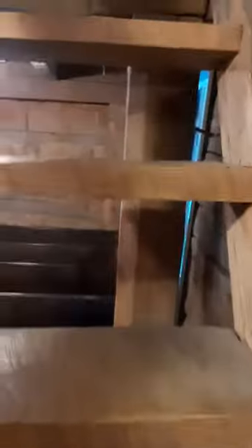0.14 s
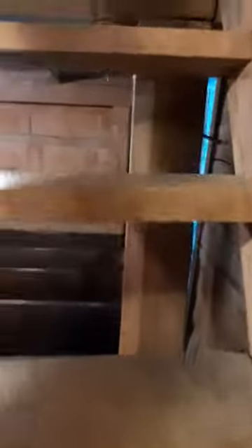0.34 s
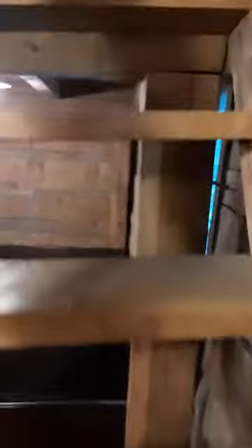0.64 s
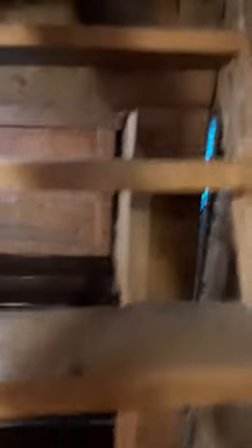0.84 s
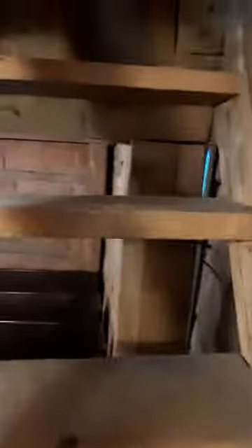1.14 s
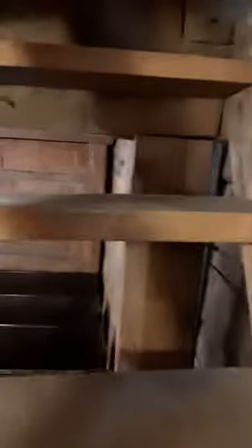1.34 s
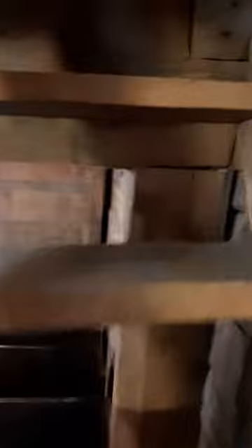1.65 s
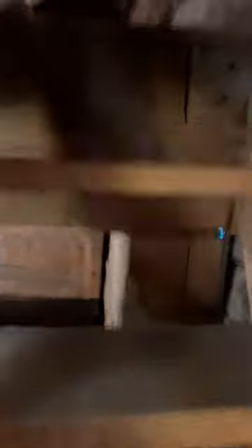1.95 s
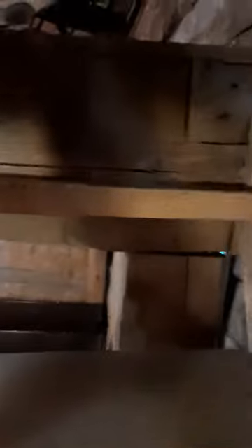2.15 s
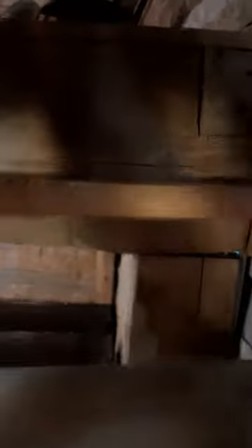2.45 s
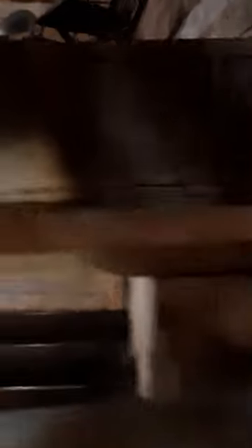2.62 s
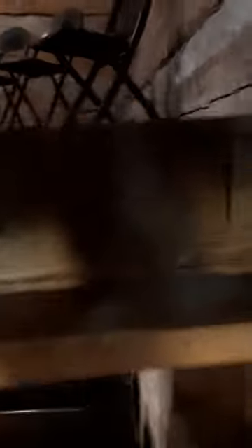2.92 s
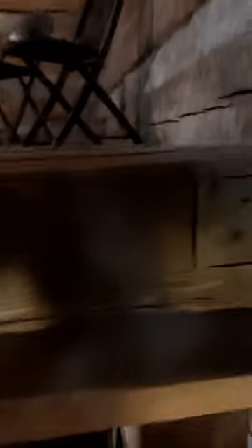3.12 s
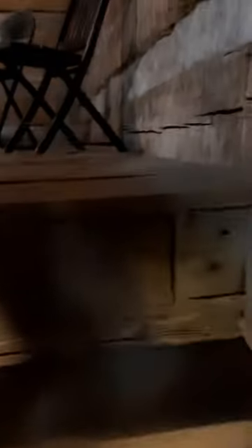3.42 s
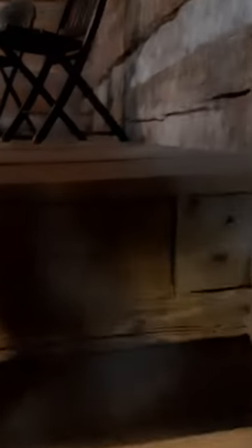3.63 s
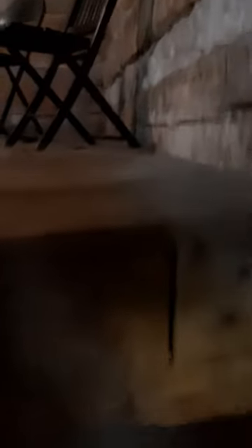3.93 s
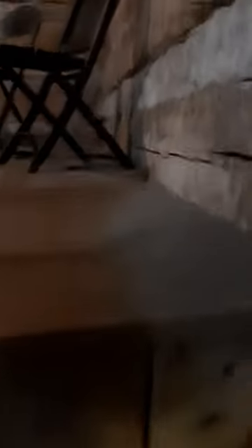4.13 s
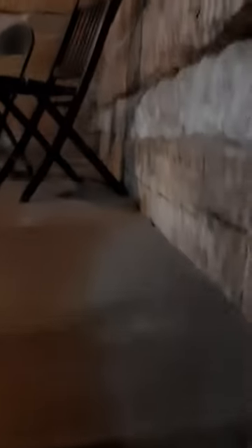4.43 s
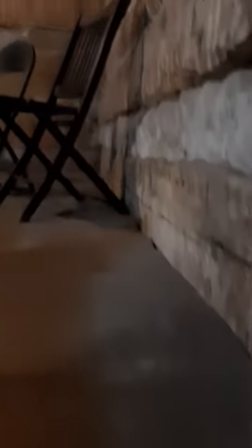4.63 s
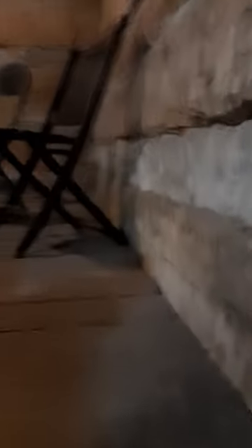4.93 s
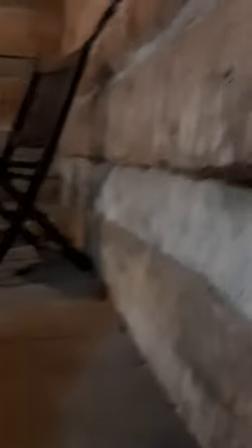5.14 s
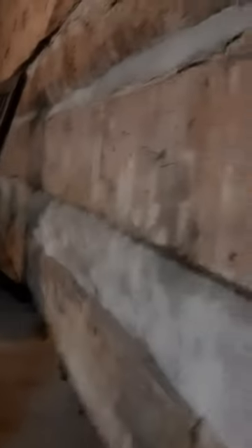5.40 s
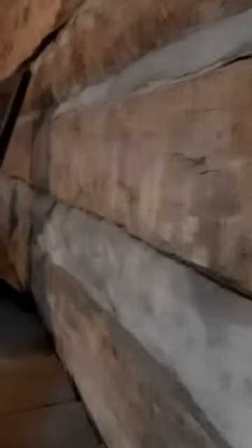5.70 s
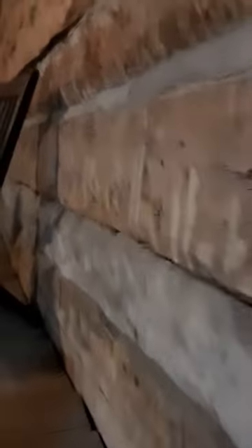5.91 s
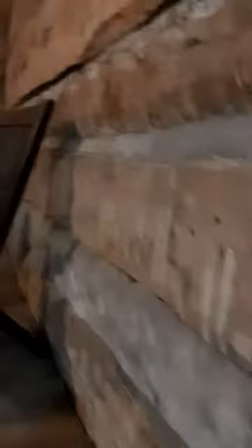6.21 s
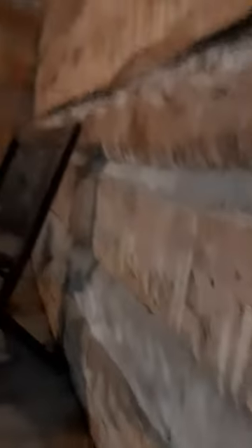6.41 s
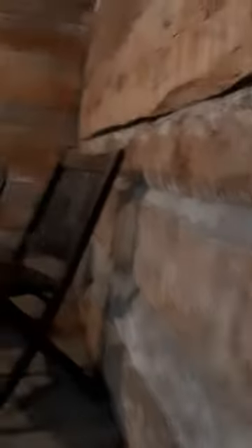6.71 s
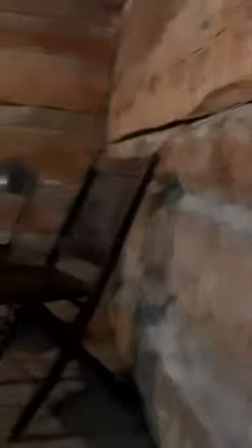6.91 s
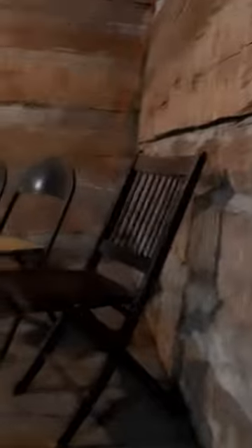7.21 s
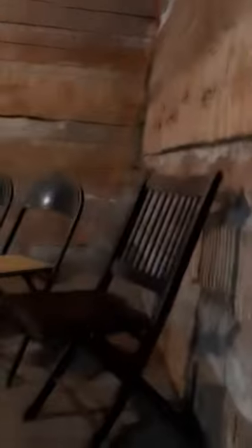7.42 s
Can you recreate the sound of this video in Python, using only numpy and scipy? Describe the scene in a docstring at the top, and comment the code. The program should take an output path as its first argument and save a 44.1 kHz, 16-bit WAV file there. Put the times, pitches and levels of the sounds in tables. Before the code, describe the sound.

Someone climbs open wooden stairs inside an old log building. Heel and toe thuds boom low through treads and beams, each trailed by a soft rumble. Dry ticks and cracks snap between steps, with short scuffs and faint cloth rustle. Later steps land heaviest, with a hollow board knocking between them. A close handheld stereo microphone favours the right; the left is duller, the room short and woody.

```python
"""Someone climbs open wooden stairs to the boarded upper floor of a log building, a phone in hand.
From the start rumble swells after each step, and cloth and shoes hiss near the right microphone.
Heels and toes boom as ringing modes and sine tones; at 0.7 s a board creaks in a short upward glide.
Noise bursts tick and crack around 2, 2.8 and 3.3 s; the heaviest steps land at 5.7 and 6.6 s.
Between, at 6.1-6.4 s, a hollow board rings. All along, the left microphone hears it later and duller."""
import sys
import numpy as np
from scipy import signal
from scipy.fft import rfft, irfft, next_fast_len
from scipy.io import wavfile
from scipy.ndimage import uniform_filter1d

SR = 44100
rng = np.random.default_rng(int(sys.argv[2]) if len(sys.argv) > 2 else 0)


def master(y):
    """Save y as 16-bit WAV."""
    cut = np.clip(np.atleast_2d(y).T, -1, 1)
    pcm = np.round(cut * 32767)  # scale
    wavfile.write(sys.argv[1], SR, pcm.astype(np.int16))


N = 333313


def from_db(db):
    """Gain of a level."""
    return 10 ** (np.asarray(db) / 20)


def rms_one(x):
    """Scales to rms 1."""
    return x / np.sqrt(np.mean(x ** 2) + 1e-20)


def colour(x, spectrum, lag=0., closed=True):
    """Shapes the spectrum and delays by lag samples; a closed shape is silent outside its range."""
    size = next_fast_len(N, True)
    hz = np.arange(size // 2 + 1) * SR / size + 1e-3   # offset avoids log(0)
    at, db = np.transpose(spectrum)
    gain = from_db(np.interp(np.log(hz), np.log(at), db))
    if closed:
        gain = gain * ((hz > at[0]) & (hz < at[-1]))
    delay = np.exp(-2j * np.pi * hz * lag / SR)
    return irfft(rfft(x, size) * gain * delay, size)[..., :N]


def drift(rate):
    """Slow random wander with spread 1: noise through two equal lowpass poles at rate Hz."""
    r = np.exp(-80 * np.pi * rate / SR)   # one value every 40 samples
    slow = signal.lfilter([1], [1, -2 * r, r * r], rng.standard_normal(N // 40 + 2002))[2000:]
    return np.interp(np.arange(N) / 40, np.arange(len(slow)), rms_one(slow))


def ring(force, hz, t60):
    """Resonator: a unit click sets a dying sine of height 1 ringing."""
    r = from_db(-60 / (max(t60, .01) * SR))
    w = 2 * np.pi * hz / SR
    return signal.lfilter([0, np.sin(w)], [1, -2 * r * np.cos(w), r * r], force + 1e-18)


def near(hz, centre_hz, octaves):
    """How strongly a mode answers a contact whose own pitch is the centre."""
    return np.exp(-.5 * (np.log2(hz / centre_hz) / octaves) ** 2)


def add(track, s, piece):
    """Mixes a piece in at a moment."""
    i = int(s * SR)
    track[..., i:i + piece.shape[-1]] += piece[..., :N - i]


def level(rows, column):
    """Gain curve from one column of a table."""
    rows = np.transpose(rows)
    return from_db(np.interp(np.arange(N) / SR, rows[0], rows[column]))


def grains(per_s, spread_db):
    """Dense random micro-contacts of uneven size over an even hiss; rms 1."""
    sizes = from_db(spread_db * np.minimum(rng.exponential(1, N), 5))
    sizes = sizes * (rng.random(N) < per_s / SR)
    return rms_one(rng.standard_normal(N) * (4.5 + rms_one(uniform_filter1d(sizes, size=12))))


ROOM_T60_S, WALL_CUT_HZ, ROOM_LOW_HZ = 0.34, 7200, 320


def room(x):
    """Ten feedback delays a side, duller on every round; the bass belongs to the timber itself."""
    size = next_fast_len(N + SR // 2, True)
    w = 2 * np.pi * np.arange(size // 2 + 1) / size
    dull = 1 / (1 + 1j * w * SR / (2 * np.pi * WALL_CUT_HZ))
    high = signal.butter(2, ROOM_LOW_HZ, "high", fs=SR, output="sos")
    sent = rfft(signal.sosfilt(high, x), size)
    out = []
    for lags in rng.uniform(.011, .035, (2, 10)) * SR:
        loops = [from_db(-60 * d / SR / ROOM_T60_S) * dull * np.exp(-1j * w * d) for d in lags]
        echoes = sum((-1) ** k * g / (1 - g) for k, g in enumerate(loops))
        out.append(irfft(sent * echoes, size)[:N])
    return np.array(out)


# swell time, fall in dB/s, level under each landing, floor at rest, remains of an earlier step
SWELL_S, DYING_DB_PER_S, LOAD_DB, REST_DB, EARLIER_DB = 0.11, 50, -20.5, -73.5, -54.5
# colour of the loaded timber's rumble: [f/Hz, spectral level/dB]
RUMBLE_COLOUR = [(18, -38), (30, -1.5), (57, 2), (81, 5.5), (233, -8.5), (400, -16.5), (520, -17.5),
                 (880, -120)]


def rumble():
    """The loaded timber never quite rests: it swells after each landing, then dies away."""
    t = np.arange(0, N + 100, 100) / SR
    power = from_db(2 * REST_DB) + from_db(2 * (EARLIER_DB - DYING_DB_PER_S * t))
    for s, db, *_ in LANDINGS:
        swell = np.clip((t - s) / SWELL_S, 0, 1) ** 4
        dying_db = db + LOAD_DB - DYING_DB_PER_S * np.abs(t - s - SWELL_S)
        power += swell * from_db(2 * dying_db)
    gain = np.interp(np.arange(N) / SR, t, np.sqrt(power))
    noise = rms_one(colour(rng.standard_normal(N), RUMBLE_COLOUR))
    return gain * from_db(2.4 * drift(22)) * noise


RUSTLE_DB, HISS_DB, SCUFF_DB = 5.5, 2.5, 5.5   # over the movement curves
# the walker's movement, before those gains: [t/s, cloth level/dB, shoe scuff level/dB]
MOVEMENT = [(0.0, -78.5, -73.5), (0.23, -73.5, -89.5), (0.42, -71, -75), (0.71, -73.5, -82.5),
            (0.95, -68.5, -77), (1.39, -79.5, -85.5), (1.74, -73, -81), (1.96, -68.5, -77),
            (2.21, -78, -85), (2.86, -68, -73.5), (3.43, -73, -80), (4.08, -70.5, -76), (4.38, -74, -83),
            (4.69, -70, -80.5), (4.97, -79, -79.5), (5.28, -69, -75.5), (5.64, -74.5, -81.5),
            (6.34, -73, -68), (6.78, -68.5, -73), (7.07, -62.5, -72), (7.3, -72, -75.5), (7.56, -71, -72)]
# colour of shoe scuff: [f/Hz, spectral level/dB]
SCUFF_COLOUR = [(180, -16), (300, -8.5), (629, -6), (1040, -9.5), (1230, -10), (1520, -3), (1740, -10),
                (2070, -3), (2390, -6), (3500, -6), (4550, -63), (7700, -120)]
# colour of the main cloth band: [f/Hz, spectral level/dB]
RUSTLE_COLOUR = [(1760, -21), (3000, -11), (4910, 6), (5950, 2), (7660, -2), (8560, -14), (9000, -9.5),
                 (11700, -50), (19800, -120)]
# colour of the upper cloth band: [f/Hz, spectral level/dB]
HISS_COLOUR = [(5000, -8), (8500, -34.5), (9300, -6.5), (11500, 4), (13500, 4), (15100, 6.5), (16000, -42)]


def moving():
    """Shoe scuff and two bands of cloth noise, flickering together; the cloth bands share their grains."""
    cloth = grains(400, spread_db=3.5)
    flicker_db = 1.8 * drift(12)
    scuff = from_db(SCUFF_DB + flicker_db + 3.1 * drift(19))
    scuff = scuff * rms_one(colour(grains(150, spread_db=3.0), SCUFF_COLOUR))
    rustle = from_db(RUSTLE_DB + flicker_db) * rms_one(colour(cloth, RUSTLE_COLOUR))
    hiss = from_db(HISS_DB + 2.3 * flicker_db + 1.0 * drift(9.7)) * rms_one(colour(cloth, HISS_COLOUR))
    return level(MOVEMENT, column=2) * scuff + level(MOVEMENT, column=1) * (rustle + hiss)


# short rising creak of a board: [t/s, length/s, start f/Hz, end f/Hz, level/dB, octave level/dB]
BOARD_CREAK = (.664, .027, 640, 830, -57, -7)


def creak():
    """A board slips briefly: a tone and its octave glide up, uneven in level."""
    s, length, from_hz, to_hz, db, octave_db = BOARD_CREAK
    t = np.arange(int(length * SR)) / SR
    phase = 2 * np.pi * np.cumsum(from_hz + (to_hz - from_hz) * t / length) / SR
    tone = np.sin(phase) + from_db(octave_db) * np.sin(2 * phase)
    uneven = from_db(db + 2.6 * rng.standard_normal(20).repeat(70)[:len(t)])
    out = np.zeros(N)
    add(out, s, uneven * np.sqrt(np.sin(np.pi * t / length)) * tone)
    return out


HOLLOW_FROM_S, HOLLOW_TO_S = 6.09, 6.4   # the hollow board is knocked in this span
HOLLOW_DB, HOLLOW_PAN_DB = -3, -6.5   # ring against its tick; left against right
# modes of the hollow board: [f/Hz, level/dB, t60/s]
HOLLOW_MODES = [(420, -7.5, 0.079), (833, 1, 0.077), (1320, 4, 0.034), (1534, -0.5, 0.048),
                (2076, -2, 0.055), (2420, -11, 0.027), (2685, -5.5, 0.04)]


def hollow():
    """Ticks on the hollow board set its modes ringing cleanly; left and right."""
    clicks = np.zeros((len(HOLLOW_MODES), N))
    for s, db, *_ in TICK_EVENTS:
        if HOLLOW_FROM_S < s < HOLLOW_TO_S:
            uneven_db = rng.normal(0, 1.2, len(HOLLOW_MODES))
            clicks[:, int(s * SR)] = from_db(db + HOLLOW_DB + uneven_db)
    rings = sum((-1) ** k * from_db(db) * ring(clicks[k], hz, t60)
                for k, (hz, db, t60) in enumerate(HOLLOW_MODES))
    return rings * from_db([[HOLLOW_PAN_DB], [0]])


FAINT_COUNT, FAINT_DB, FAINT_SPREAD_DB = 14, -59, 3   # level varies evenly by plus or minus the spread
FAINT_BOARD_DB, FAINT_EDGE_DB = -25, -18


def faint_ticks():
    """Small ticks of boards and shoes at random moments and pitches, in rows like the loud ones."""
    rows = []
    for when, loud, pitch in rng.random((FAINT_COUNT, 3)):
        db = FAINT_DB + 2 * FAINT_SPREAD_DB * (loud - .5)
        rows.append((when * N / SR, db, 400 * 5 ** pitch, FAINT_BOARD_DB, FAINT_EDGE_DB))
    return rows


STROKE_RISE_S, STROKE_BOARD_DB, STROKE_PAN_DB = 0.0036, -20, -10.5   # pan: left against right
# longer scrapes over wood, and a few very short bright ticks; board level is before STROKE_BOARD_DB:
# [t/s, length/s, force level/dB, board f/Hz, board level/dB, bright edge level/dB]
STROKE_EVENTS = [(0.486, 0.19, -64.5, 656, -9.5, -17), (0.792, 0.034, -65.5, 640, -13, 0),
                 (.864, 0.07, -76, 377, 1.5, -10), (1.254, 0.09, -59.5, 1090, -2.5, 6),
                 (1.51, 0.26, -64.5, 1070, -6.5, 1), (2.785, 0.17, -53.5, 600, -13.5, 8.5),
                 (3.046, 0.017, -56, 2060, -22, 12), (3.947, 0.018, -59, 1500, -16, 24),
                 (4.798, 0.044, -69, 1570, -7, -5), (4.14, .009, -71, 474, -25, 21),
                 (4.916, 0.097, -64.5, 490, 2.5, 5), (6.418, 0.086, -59, 1490, -4.5, 0),
                 (7.109, 0.11, -60, 2470, -4.5, -7), (7.277, 0.058, -61.5, 1344, -2.5, -1)]


def stroke_contacts():
    """Scrapes and very short ticks: lumpy noise for the length of a stroke, in two draws as for ticks."""
    t = np.arange(12000) / SR
    for s, length, db, board_hz, board_db, edge_db in STROKE_EVENTS:
        stroke = np.clip(t / STROKE_RISE_S, 0, 1) * np.clip((length - t) / (0.34 * length), 0, 1)
        lumps = from_db(4.44 * rng.standard_normal(400).repeat(30))
        grit = rng.standard_normal((2, 12000)) * lumps
        yield s, grit * stroke * from_db(db), board_hz, board_db + STROKE_BOARD_DB, edge_db, STROKE_PAN_DB


# decay at board level 0 dB; its growth in dB per board dB; left against right; other boards meanwhile
TICK_T60_S, WOODY_LONGER, CONTACT_PAN_DB, HOLLOW_MUTE_DB = 0.081, 0.19, -15, -7
# ticks and cracks of boards and shoes, before the offsets below:
# [t/s, level/dB, board f/Hz, board level/dB, bright edge level/dB]
TICK_EVENTS = [(0.119, -51, 456, -17.5, -20), (0.2095, -52.5, 346, -1, -29), (0.2347, -47.5, 2210, -9, -17),
               (0.48, -52.5, 635, -15.5, -33), (0.921, -54, 1530, -21, 2), (1.2478, -56.5, 356, 3.5, -21),
               (1.3985, -51.5, 371, -28, -0.5), (1.5099, -57.5, 623, -1.5, -28),
               (1.702, -52.5, 1550, -8.5, -17), (1.823, -48, 450, -15, -11), (1.9064, -50, 439, -30, -28),
               (1.9656, -38, 2050, -18.5, -26), (1.9885, -32.5, 480, -12.5, -16),
               (2.0036, -31.5, 730, -21.5, -15), (2.139, -51, 476, -23, -6),
               (2.3359, -53.5, 435, -13.5, -13), (2.38, -47, 370, -16, -17), (2.7613, -44, 2500, -30, -18),
               (2.8004, -35, 2450, -33, -8), (2.81, -45, 2490, -12, 1), (2.9222, -40.5, 487, -12, -14),
               (3.0105, -50.5, 1560, -14.5, -8), (3.269, -32.5, 2220, -20, -21.5),
               (3.2869, -38.5, 2000, -16, -15), (3.3214, -49.5, 506, -10.5, -15),
               (3.5765, -56.5, 557, 4, -12), (3.6023, -36.5, 375, -2.5, -14.5),
               (3.6464, -46, 584, -7.5, -19), (3.9818, -41, 1500, -15, -13),
               (4.0622, -40, 1300, -22.5, -11), (4.1834, -47.5, 1530, -34, -24),
               (4.206, -34.5, 2090, -21, -14), (4.645, -43, 443, -12.5, -16),
               (4.912, -41, 1950, -10.5, -22), (5.1363, -40, 2020, -31, -28), (5.3045, -49, 2000, -25, -13),
               (5.4346, -45.5, 2070, -35, -5.5), (5.662, -44.5, 418, -1.5, -33),
               (5.677, -34.5, 372, -5.5, -14), (5.7361, -36.5, 378, -6, -13),
               (5.8331, -48.5, 394, -16, -5.5), (5.9226, -46, 503, -14, -23),
               (5.9338, -30.5, 720, -29, -17.5), (5.9932, -45.5, 710, -19, -9),
               (6.0484, -47, 1530, -13.5, -16), (6.105, -40.5, 820, -7, -19),
               (6.1299, -37, 2000, -9, -16.5), (6.1536, -36.5, 443, -7.5, -18),
               (6.2535, -47, 474, -14, -16), (6.3495, -35.5, 1950, -9.5, -19),
               (6.4616, -50.5, 2020, -5, -18), (6.5778, -34.5, 520, -8, -25),
               (6.594, -31.5, 356, -20.5, -19), (6.6597, -46, 520, -6, -29), (7.2821, -42, 1500, -20, -10),
               (7.3245, -52, 373, -1.5, -18)]
# force of a tick's first touch: [amplitude, one value per sample]
FIRST_TOUCH = 6 * np.array([.5, .6, -.4, -.8, -.1])


def tick_contacts(sharp=0.75, drier=0.25, sputter_db=-6, to_board_db=-11, to_edge_db=18):
    """A snap, sharper when dry and dull, then a dying lumpy sputter; two draws: shared and scattered."""
    t = np.arange(4000) / SR
    for s, db, board_hz, board_db, edge_db in list(TICK_EVENTS) + faint_ticks():
        t60 = np.clip(TICK_T60_S * from_db(WOODY_LONGER * board_db), .004, .1)
        burst = rng.standard_normal((2, 4000)) * from_db(2.5 * rng.standard_normal(100).repeat(40))
        burst *= from_db(-60 * t / t60)
        # energy follows the decay
        burst /= np.sqrt(np.sum(burst ** 2, axis=1, keepdims=True) / (t60 * SR / 14))
        burst *= 1 + sharp * np.exp(-t / 0.00071)   # most force comes at first touch
        burst[:, :5] += FIRST_TOUCH * from_db(-drier * (edge_db + board_db + 41))
        board_db += HOLLOW_MUTE_DB * (HOLLOW_FROM_S < s < HOLLOW_TO_S)
        force = burst * from_db(db + sputter_db)
        yield s, force, board_hz, board_db + to_board_db, edge_db + to_edge_db, CONTACT_PAN_DB


# colour of the crack band: [f/Hz, gain/dB]
CRACK_COLOUR = [(900, -5.5), (2000, 1), (3500, 4), (5500, 5.5), (7500, -1), (8700, -10)]
# colour of the bright edge: [f/Hz, gain/dB]
EDGE_COLOUR = [(8800, -10.5), (11000, -9), (13000, -3), (14200, -5), (16000, -1)]
# modes of the thin boards, shared with the landings; ticks halve the t60: [f/Hz, level/dB, t60/s]
BOARD_MODES = [(348.7, 3, 0.038), (386, 9, 0.027), (439.4, -0.5, 0.081), (494, 3.5, 0.041),
               (583.5, -2, 0.14), (654, 4.5, 0.041), (770, -3.5, 0.15), (837, 1, 0.078), (1074, 4, 0.062),
               (1230, 9, 0.017), (1540, 4.5, 0.076), (1678, 1, 0.053), (2070, 1.5, 0.046),
               (2388, 4.5, 0.018), (2810, -13, 0.24), (3050, -39, 0.11)]


def ticks(scattered=1.0):
    """Each contact has a crack band, a bright edge and the ring of boards near its pitch; left and right."""
    modes = np.array(BOARD_MODES)
    crack, edge, board = np.zeros((2, N)), np.zeros((2, N)), np.zeros((len(modes), 2, N))
    events = list(tick_contacts()) + list(stroke_contacts())
    for s, (direct, other), board_hz, board_db, edge_db, pan_db in events:
        # part of the force scatters on the way to the left; the angle is in radians
        left = direct * np.cos(scattered) + other * np.sin(scattered)
        force = np.array([left, direct]) * from_db([[pan_db], [0]])
        add(crack, s, force)
        add(edge, s, force * from_db(edge_db))
        answer = from_db(board_db + modes[:, 1]) * (near(modes[:, 0], board_hz, 0.17) + 0.42)
        bent = from_db([[0.63 * pan_db], [0]])   # low sound bends round
        add(board, s, answer[:, None, None] * direct * bent)
    rings = sum((-1) ** k * ring(board[k], hz, 0.5 * t60) for k, (hz, db, t60) in enumerate(modes))
    return colour(crack, CRACK_COLOUR) + colour(edge, EDGE_COLOUR) + rings


TREAD_DB, FALL_S = -8.5, 0.041   # tread against landing level; how fast the weight settles
# modes of beams and treads: [f/Hz, level/dB, t60/s]
TIMBER_MODES = [(52, -8, 0.36), (65.55, 6.5, 0.77), (70.7, -2.5, 0.97), (87, -11, .4), (106, -21, 0.16),
                (112.8, 0.5, 0.44), (125.4, -17, 0.91), (143.2, 10.5, 0.31), (160.7, 4.5, 0.14),
                (177.3, 3, 0.53), (188, 8, 0.084), (202.3, 12, 0.25), (228.5, 5.5, 0.41), (257.5, 6, 0.22),
                (305, -3, 0.26)]
# heel and toe landings; beam and knock levels are relative to the landing, before the gains below:
# [t/s, level/dB, beam f/Hz, beam level/dB, tread f/Hz, knock f/Hz, knock level/dB]
LANDINGS = [(0.024, -51, 126, -12, 178, 346, -4), (0.208, -42, 124, -14, 181.7, 344, -20),
            (0.253, -39, 78.1, -18, 197, 387, -15.5), (0.328, -45, 71.5, -21, 192, 353, -22),
            (0.477, -61.5, 64.6, -26, 170, 630, -1), (0.866, -58, 114, -20, 212.4, 383, -5.5),
            (1.246, -39, 124, -22, 154, 354, -8.5), (1.292, -35, 125, -24, 144.4, 377.5, -12.5),
            (1.398, -50, 118, -20, 156, 367, -14), (1.506, -52.5, 86.1, -31, 238, 632, 2.5),
            (1.562, -46, 59.2, -21, 266, 590, -9), (1.698, -53.5, 86.1, -5, 137.5, 482, -27),
            (1.98, -54, 93, -6, 235, 428, 0), (2.334, -44, 123, -14.5, 191.3, 433, -27),
            (2.409, -45, 128, -13, 147.5, 354, -25), (2.52, -51.5, 117, -12, 127.6, 333, -31),
            (2.871, -62, 73.6, -8, 157, 548, 7), (3.575, -42, 125, -33, 205, 590, -12),
            (3.599, -35.5, 64.6, -16, 222.6, 400, -5.5), (3.648, -36.5, 76, -12.5, 222, 593, -5),
            (3.714, -35.5, 76.4, -6.5, 121.5, 586, -12), (3.838, -43.5, 117, -9, 215, 422, -10),
            (3.96, -45.5, 105, -5.5, 189.6, 331, -22), (4.127, -58.5, 61.4, -3, 185, 409, -29),
            (4.643, -43, 78, -8, 214, 446, -8.5), (4.699, -40, 118, -29, 140, 363, -24),
            (4.801, -54, 75, 0, 126, 534, -15), (4.91, -45, 107, -12, 154.5, 473, -4),
            (5.095, -58, 73, 1.5, 134.5, 350, -29), (5.289, -76.5, 75, 15, 138, 546, -21),
            (5.662, -39.5, 126, -13, 202, 428, -10), (5.673, -28.5, 91.5, -16, 181.6, 380, -14.5),
            (5.736, -37.5, 119, -4, 124, 385, -6), (5.788, -41.5, 116, -8, 212, 342, -19),
            (5.928, -45.5, 62.4, -2, 131.5, 683, -6), (6.039, -52, 56, -4.5, 144, 377, -21),
            (6.154, -46, 67, -9, 173, 440, -5), (6.577, -25.5, 105.7, -5, 176, 492, -18),
            (6.658, -37.5, 123, -10, 187.5, 405, -12), (6.717, -37.5, 101.7, -2.5, 120, 553, -14.5),
            (6.808, -46, 94.2, 1, 207, 331, -25), (7.152, -46, 105, -2.5, 126, 505, -7),
            (7.2, -40.5, 106, -18, 187.7, 350, -25), (7.37, -50.5, 58.7, -1.5, 127, 331, -14)]


def landings(tone_db=3.5, timber_db=-12, knock_db=-6, mode_db=4.5, rise=0.0073, focus_db=-4):
    """Beam and tread under the foot swell and die as the weight comes on, and shake the building's modes."""
    modes = np.array(TIMBER_MODES + BOARD_MODES)
    mode_hz = modes[:, 0]
    force, tones = np.zeros((len(modes), N)), np.zeros(N)
    t = np.arange(SR // 4) / SR
    weight = np.clip(t / rise, 0, 1) * np.exp(-(np.maximum(t - rise, 0) / FALL_S) ** 1.04)
    for s, db, beam_hz, beam_db, tread_hz, knock_hz, rel_db in LANDINGS:
        phase = rng.uniform(0, 2 * np.pi, 2)
        tone = from_db(beam_db) * np.sin(2 * np.pi * beam_hz * t + phase[0])
        tone += from_db(TREAD_DB) * np.sin(2 * np.pi * tread_hz * t + phase[1])
        # the nearest board
        tone += from_db(rel_db + focus_db) * np.exp(-t / FALL_S) * np.sin(2 * np.pi * knock_hz * t)
        add(tones, s, from_db(db + tone_db) * weight * tone)
        answer = from_db(timber_db + beam_db) * near(mode_hz, beam_hz, 0.37)
        answer += from_db(timber_db + TREAD_DB) * near(mode_hz, tread_hz, 1.0)
        knock = near(mode_hz, knock_hz, 0.27) + 250 / mode_hz
        answer += from_db(knock_db + rel_db) * knock * (mode_hz > TIMBER_MODES[-1][0])   # boards only
        answer *= from_db(db + modes[:, 1] + rng.normal(0, mode_db, len(modes)))
        uneven = rng.standard_normal((len(modes), 3000)) * weight[:3000] / np.sqrt(FALL_S * SR)
        add(force, s, uneven * answer[:, None])
    return tones + sum(ring(f, hz, t60) for f, (hz, db, t60) in zip(force, modes))


LEFT_LAG, ROOM_DB = 21.5, -17.5   # lag in samples
# shading of the left microphone: [f/Hz, gain/dB]
LEFT_SHADE = [(60, -5), (400, -1), (1300, -23.5), (2400, -39), (4400, -13), (15000, -32)]
# rustle heard at the left microphone alone: [f/Hz, gain/dB]
LEFT_RUSTLE = [(300, -6), (1500, -4), (5000, -26.5), (8700, -11.5), (15000, -11)]


def scene():
    """The right microphone is nearest; the left gets the sound late and shaded, plus rustle of its own."""
    close = landings() + creak() + rumble() + moving()
    tick_left, tick_right = ticks() + hollow()
    right = close + tick_right
    left = colour(close, LEFT_SHADE, LEFT_LAG, closed=False) + np.roll(tick_left, int(LEFT_LAG))
    left += colour(moving(), LEFT_RUSTLE, closed=False)
    return np.array([left, right]) + from_db(ROOM_DB) * from_db([[-3], [0]]) * room(right)


def record(dry):
    """The deepest bass is rolled off below 48 Hz, the top is cut 60 dB from 16.6 kHz up."""
    dry = signal.sosfilt(signal.butter(4, 48, "high", fs=SR, output="sos"), dry)
    return signal.sosfilt(signal.cheby2(14, 60, 16600, fs=SR, output="sos"), dry)


dry = scene()
out = record(dry)
master(out)
```